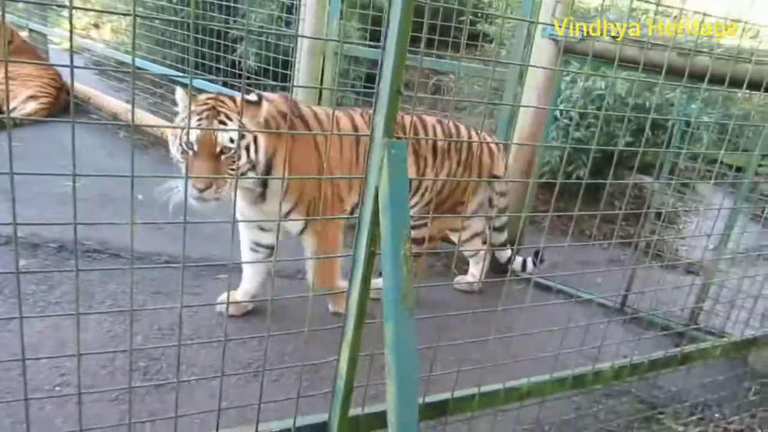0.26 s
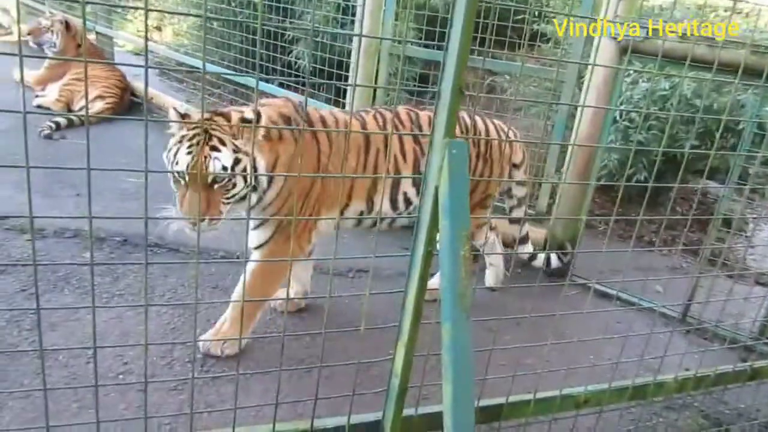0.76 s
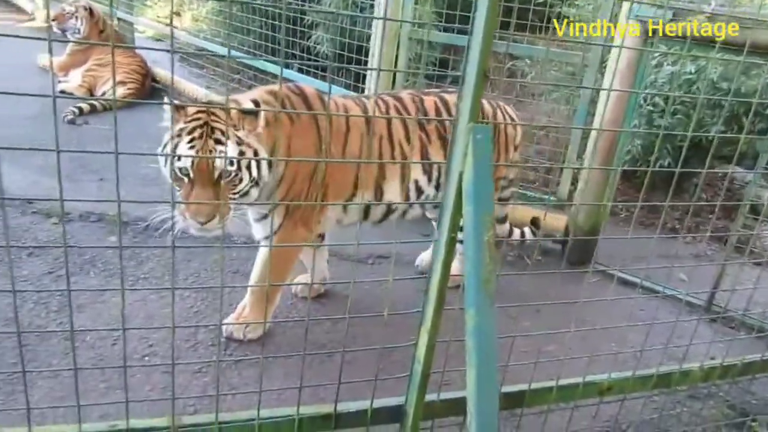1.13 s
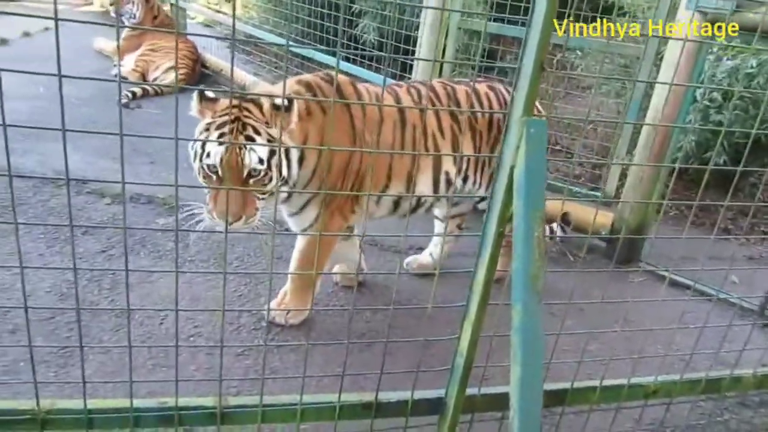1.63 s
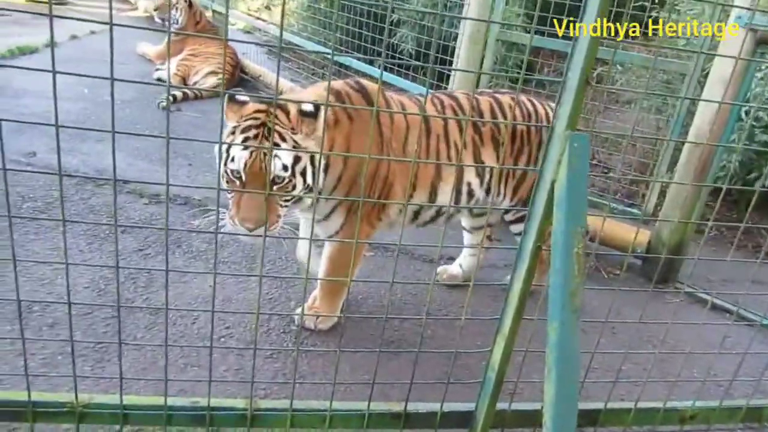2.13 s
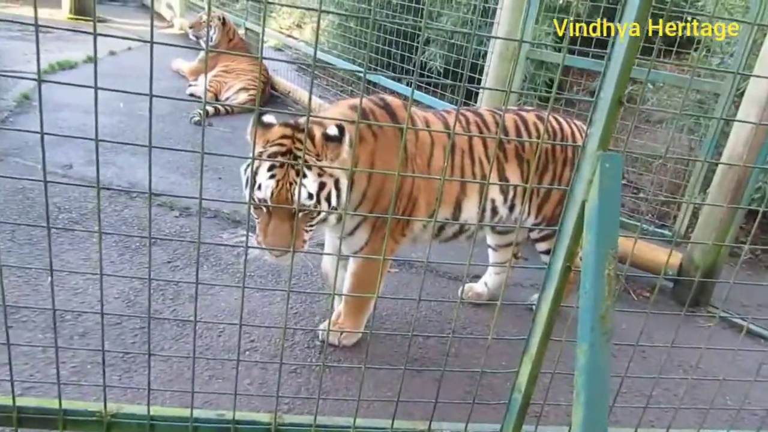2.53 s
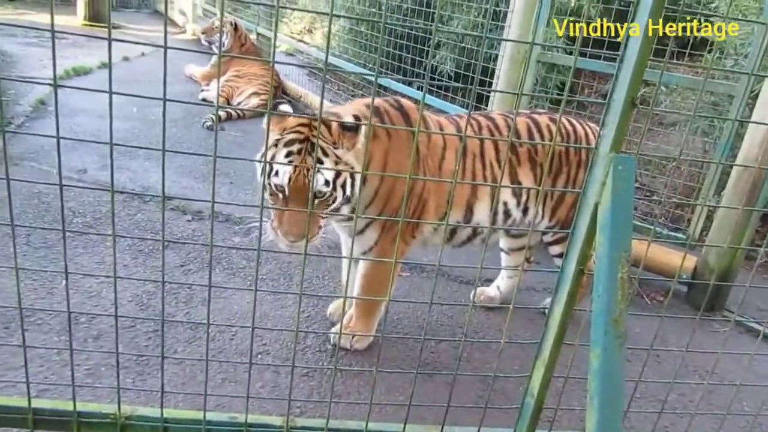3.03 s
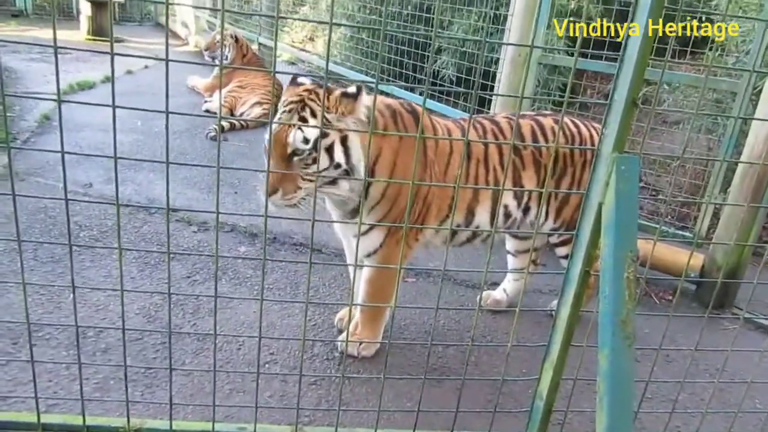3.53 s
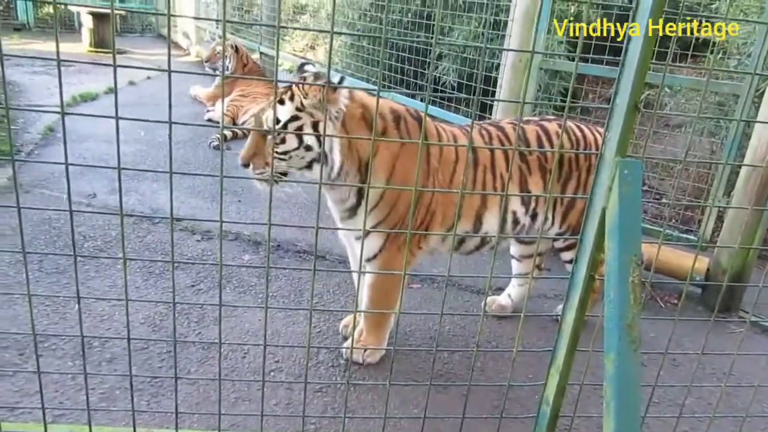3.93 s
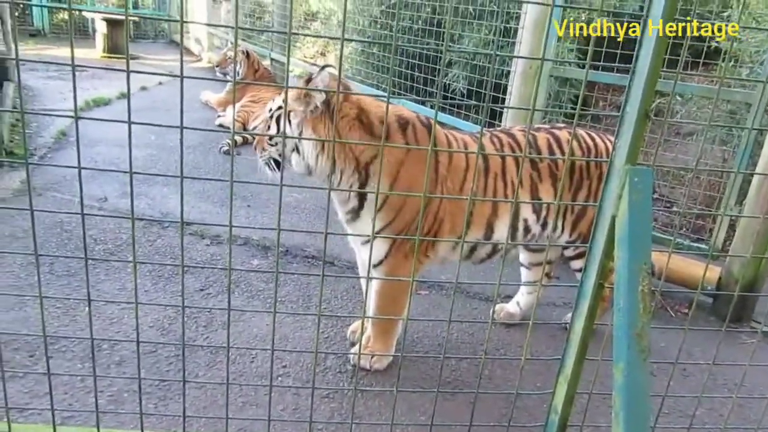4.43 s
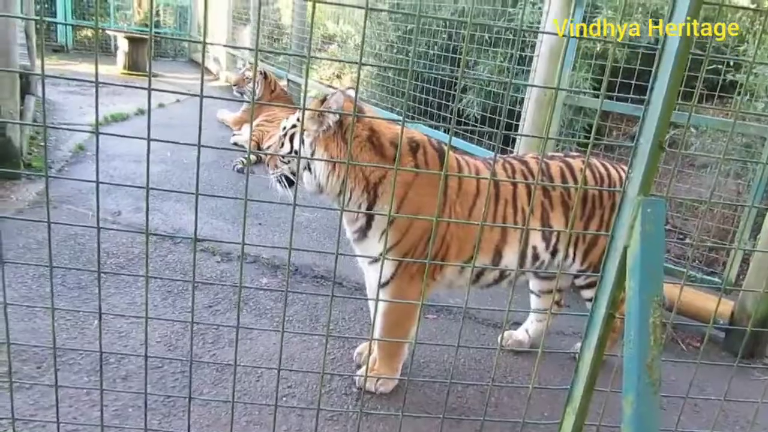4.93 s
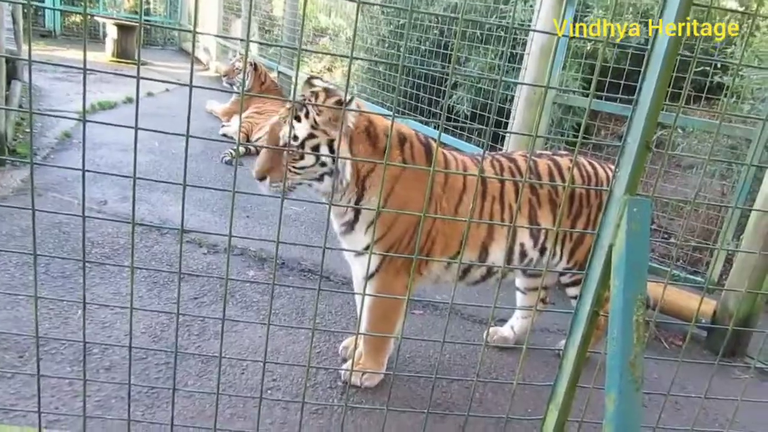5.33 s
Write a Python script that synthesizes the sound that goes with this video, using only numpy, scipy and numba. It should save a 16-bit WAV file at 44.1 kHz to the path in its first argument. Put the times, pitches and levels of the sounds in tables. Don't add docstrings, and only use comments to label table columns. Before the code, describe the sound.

A big cat calls at close range in an outdoor pen, over far traffic rumble and soft hiss. A wavering low chest hum fills the first 0.2 s, and from about 0.12 s a violent short roar bursts through it, loudest near 0.2 s, swinging between hoarse tone and rough, breathy chaos, overdriving the microphone, and falling away by 0.75 s. A tiny lip smack comes at 0.78 s. From 0.82 s a deep growl flaps about forty times a second with irregular harder slaps, strong around 1.0 and 1.5 s; the jaw opens and it brightens, catches briefly, then thins into rattling puffs ending near 2.37 s. The airy background dims until 3.6 s. Faint high bird whistles come at 2.2-2.6 s, lower ones at 4.1-4.8 s. Soft wind thuds bump from 2.95 s, strongest at 4.7 and 5.4 s. Tiny wire ticks fall at 3.77 and 4.78 s.

```python
import sys
import numpy as np
from scipy import signal
from scipy.fft import rfft, irfft, next_fast_len
from scipy.io import wavfile
from scipy.ndimage import uniform_filter1d, map_coordinates
from numba import njit

SR = 44100
rng = np.random.default_rng(int(sys.argv[2]) if len(sys.argv) > 2 else 0)


def ratio(d):
    e = np.asarray(d, float) / 20
    return 10 ** e


def digitize_waveform(pressure):
    field = np.atleast_2d(pressure).T
    bounded = np.clip(field, -1, 1)
    quanta = np.round(bounded * 32767).astype(np.int16)
    wavfile.write(sys.argv[1], SR, quanta)


N = 246078

# frequency in Hz, density in dB per Hz.
RUMBLE_SPECTRUM = [(12, -38), (20, -8.5), (54, -2.5), (140, -3), (162, -4.5), (193, -6.5), (285, -10.5),
                   (353, -26), (400, -13), (520, -34.5), (880, -120)]
# frequency in Hz, density in dB per Hz.
HISS_SPECTRUM = [(300, -3.5), (500, -3), (890, 1.5), (1300, -4), (1900, -7.5), (2600, -15.5), (4000, -24.5),
                 (6000, -26.5), (9000, -30), (12000, -36.5), (15000, -42)]
# frequency in Hz, density in dB per Hz.
PEN_SPECTRUM = [(40, -36), (300, 8.5), (800, 2.5), (1600, -2.5), (2500, -10), (5000, -15.5), (8500, -13.5),
                (8700, -39.5)]
# time in seconds, pitch in Hz, level in dB.
PRELUDE = [(0.0, 159.3, -20), (0.032, 170.7, -28), (0.138, 143.7, -18.5), (0.178, 172, -14.5),
           (0.2, 176, -31.5)]
# time in seconds, pitch in Hz, effort in dB, chaos 0-1, breath in dB.
ROAR = [
    (.118, 330, -20, 1.02, -23.5),
    (.165, 491.1, -4.5, 1.05, -16),
    (.2, 427.1, 12.5, 0.45, -17),
    (.28, 375.6, -4, 0.91, -12),
    (.44, 266.1, 1.5, 0.26, -22.5),
    (.52, 327.5, -3.5, 0.51, -10.5),
    (.64, 284.2, -8, 0.57, -22),
    (.73, 260.7, -18, 0.8, -34.5),
    (.77, 259.3, -52, 0.54, -56),
]
# centre in Hz, width in Hz, level in dB.
ROAR_THROAT = [(258.6, 66, 2), (429, 153, -5)]
# centre in Hz, width in Hz, level in dB.
ROAR_MOUTH = [(680, 75, 0), (960, 110, -4), (1280, 220, -6)]
# centre in Hz, width in Hz, level in dB.
ROAR_RASP = [(1710, 110, 21.5), (2220, 2200, 6.5), (3450, 510, -29.5), (4240, 3000, 4)]
# time in seconds, dip in dB.
CATCHES = [
    (.566, 9.5),
    (.628, 6.5),
    (1.377, 19),
    (1.533, 14),
]
# time in seconds, chest pitch in Hz, effort in dB, jaw opening 0-1.
GROWL = [
    (.82, 178, -26.5, 0.13),
    (.9, 174.8, -18, 0),
    (1.0, 161.2, -21.5, 0.25),
    (1.07, 169.4, -15.5, 0.49),
    (1.19, 143.6, -19, 0.45),
    (1.29, 135.3, -17.5, 0.99),
    (1.48, 143.6, -17, 0.86),
    (1.8, 112.9, -26, 0.6),
    (2.365, 113.3, -40, 0.56),
]
# time in seconds, peak in dB.
SLAPS = [(0.839, -19), (0.864, -11), (0.897, -11.5), (0.918, -9.5), (0.946, -9), (1.022, -0.5),
         (1.059, -18), (1.13, -6.5), (1.2, -6.5), (1.236, -14.5), (1.279, -21.5), (1.32, -9.5),
         (1.388, -16.5), (1.442, -10), (1.517, 0.5), (1.551, -13.5), (1.599, -9), (1.659, -8),
         (1.71, -12.5), (1.734, -6), (1.81, -10.5), (1.886, -18), (1.95, -13), (1.979, -16), (2.033, -13.5),
         (2.09, -17.5), (2.198, -11.5), (2.27, -12), (2.324, -16), (2.351, -15)]
# centre in Hz, width in Hz, level in dB.
OPEN_RASP = [(1597, 81, 13.5), (2104, 110, 7.5), (2520, 210, 8.5), (2950, 260, 6), (3300, 314, 7.5),
             (4140, 180, -3)]
# centre in Hz, width in Hz, level in dB.
NARROW_RASP = [(1685, 23, 17.5), (2150, 260, 9.5), (2420, 180, 6), (3290, 44, 16), (4130, 280, 4)]
# frequency in Hz, T60 in seconds.
YARD_T60 = [(150, 0.44), (1000, 0.082), (5000, 0.14)]
# start in seconds, length in seconds, first pitch in Hz, last pitch in Hz, level in dB.
BIRDS = [(2.24, .085, 7100, 6200, -56), (2.425, .07, 7350, 7330, -48), (2.495, .04, 6800, 6100, -53),
         (2.575, .06, 6200, 5000, -54), (4.09, .035, 3850, 3780, -59), (4.135, .04, 4550, 4480, -58),
         (4.2, .06, 3320, 3250, -57), (4.205, .07, 4550, 4500, -59), (4.445, .04, 3820, 3830, -58),
         (4.495, .06, 2820, 2780, -51), (4.58, .04, 3830, 3820, -59), (4.74, .035, 3800, 3800, -60)]
# start in seconds, peak in dB, frequency in Hz.
THUDS = [
    (2.95, -29, 68),
    (4.018, -29.5, 78),
    (4.44, -33, 50),
    (4.708, -25, 57),
    (5.21, -31.5, 68),
    (5.39, -22.5, 40.4),
]
# start in seconds, peak in dB, ring in Hz, crack share 0-1.
TICKS = [
    (3.769, -37, 6800, .25),
    (4.7816, -37, 12000, 1),
]
# time in seconds, offset in full scale.
OFFSET = [(0, -.027), (.7, -.024), (1.1, -.02), (2, -.019), (2.6, -.016), (3.6, 0)]

# dB at effort -19 dB and shut jaw, dB per dB of effort, dB gained by the open jaw.
CHEST_DB, THROAT_DB, MOUTH_DB = (-23, 1.34, 0.092), (-21.5, 1.02, -3.5), (-28, 0.33, 3.33)
RASP_DB, HUM_DB = (-58, 0.35, 30.4), (-21.5, 0.72, -1.6)
MIDDLE_DB, HIGH_DB = (-12.5, 0.45, 17.5), (-3, 0.1, -3.5)
# Hz with shut jaw, Hz gained by the open jaw, drift in Hz per second.
THROAT_HZ, LOW_HZ, MIDDLE_HZ, HIGH_HZ = (427, -53, -39), (697, 178, 8.4), (1008, 80, 25), (1376, 80, -130)


def unit(x):
    return x / np.sqrt(np.mean(x ** 2) + 1e-20)


def along(points, hz):
    f, v = np.transpose(points)
    return np.interp(np.log(hz + 1), np.log(f + 1), v)


def curves(rows):
    s, *cols = np.transpose(rows)
    return np.array([np.interp(np.arange(N) / SR, s, c) for c in cols])


def wobble(rate_hz):
    knots = rng.standard_normal(int(N * rate_hz / SR) + 4)
    return map_coordinates(knots, [np.arange(N) * rate_hz / SR])


def filtered(x, response):
    m = next_fast_len(N + SR // 2)
    return irfft(rfft(x, m) * response(np.fft.rfftfreq(m, 1 / SR)), m)[..., :N]


def modes(x, table):
    def response(f):
        total = 0
        for k, (centre, width, db) in enumerate(table):
            band = 1j * f * width
            total = total + (-1) ** k * ratio(db) * band / (centre * centre - f * f + band)
        return total
    return unit(filtered(x, response))


@njit
def resonate(x, turn, radius):
    y = np.zeros(len(x))
    for i in range(2, len(x)):
        y[i] = x[i] - x[i - 2] + 2 * radius * np.cos(turn[i]) * y[i - 1] - radius * radius * y[i - 2]
    return y


def cavity(x, hz, width_hz, skirt_hz):
    for w in (width_hz, skirt_hz):
        x = resonate(x, 2 * np.pi * hz / SR, np.exp(-np.pi * w / SR))
    return unit(x)


def rush(spectrum, patchy_db):
    z = signal.stft(rng.standard_normal(N + 512), nperseg=512)[2]
    field = uniform_filter1d(rng.standard_normal(z.shape), 5, 0)
    field = uniform_filter1d(field, 12, 1)
    noise = signal.istft(z * ratio(patchy_db * unit(field)), nperseg=512)[1][:N]
    return unit(filtered(noise, spectrum))


def law(rule, effort_db, jaw):
    return rule[0] + rule[1] * (effort_db + 19) + rule[2] * jaw


def caught(effort_db):
    width_s = .009
    t = np.arange(N) / SR
    return effort_db - sum(db * np.exp(-((t - s) / width_s) ** 2) for s, db in CATCHES)


def background():
    t = np.arange(N) / SR
    rumble_db = -36.5 + 2.3 * wobble(5.56)
    rumble = ratio(rumble_db) * rush(lambda hz: ratio(along(RUMBLE_SPECTRUM, hz)), patchy_db=1.5)
    hiss_db = -37 + 0.24 * wobble(4)
    hiss = ratio(hiss_db) * rush(lambda hz: ratio(along(HISS_SPECTRUM, hz)) * (hz > 150), patchy_db=.5)
    pen = ratio(-33.5) * rush(lambda hz: ratio(along(PEN_SPECTRUM, hz)), patchy_db=2.1)
    fade = np.interp(t, (2.03, 3.64), [1, 0])
    duck = ratio(-4 * np.exp(-((t - 2.465) / 0.046) ** 2))
    return rumble + hiss + pen * fade * duck


def hum(gate, pitch_hz, waver):
    pitch_hz = pitch_hz * (1 + waver * wobble(39.69))
    smooth = uniform_filter1d(uniform_filter1d(gate, size=450), size=450)
    throb = unit(1 + 9 * smooth) * ratio(1.4 * wobble(13.23))
    return throb * np.sqrt(2) * np.sin(2 * np.pi * np.cumsum(pitch_hz) / SR)


def roar():
    pitch_hz, effort_db, chaos, bark_db = curves(ROAR)
    t = np.arange(N) / SR
    on = (t > ROAR[0][0]) & (t < ROAR[-1][0])
    chaos = np.clip(chaos, 0, 1)
    effort_db = caught(effort_db)
    pitch_hz = pitch_hz * (1 + np.sqrt(chaos) * (.15 * wobble(55) + .07 * wobble(130)))
    phase = 2 * np.pi * np.cumsum(pitch_hz) / SR

    fold_noise = cavity(rng.standard_normal(N), pitch_hz, width_hz=72, skirt_hz=310)
    throat = modes(modes(rng.standard_normal(N), ROAR_THROAT), ROAR_THROAT)
    throat_share = np.interp(t, (0.21, 0.26), [.25, .7])
    wild = unit(fold_noise + throat_share * throat)
    swing = signal.hilbert(np.sqrt(2 - 2 * chaos) * np.sin(phase) + np.sqrt(chaos) * wild)
    voice = np.real(swing + .13 * swing ** 3 / (np.abs(swing) ** 2 + 1e-9))
    voice = voice + 0.14 * np.real(swing ** 2 / (np.abs(swing) + 1e-9))

    spits = rng.standard_normal(N) * ratio(3 * wobble(75))
    bark = ratio(bark_db) * modes(spits, ROAR_MOUTH)
    rasp_db = -32 + 0.77 * (bark_db + 22)
    rasp_onset = np.clip((t - .11) / .07, 0, 1) ** 2
    upper = on * (bark + ratio(rasp_db) * modes(spits, ROAR_RASP) * rasp_onset)
    driven_db = np.maximum(effort_db + 2, 0) - 3.5
    burst = on * ratio(effort_db) * voice + ratio(driven_db) * upper
    return burst, ratio(-7.5) * upper


def smack():
    start_s, level_db, decay_s = .776, -23, .004
    t = np.arange(N) / SR
    envelope = (t > start_s) * np.exp(-np.abs(t - start_s) / decay_s)
    return ratio(level_db) * envelope * modes(rng.standard_normal(N), [(1750, 600, .1)])


def flaps(puff_s, spit_s):
    flap_rate_hz = 41
    hard, peak_db = np.transpose(SLAPS)
    marks = np.r_[.01, hard, hard[-1] + .06]
    counts = np.maximum(1, np.round(np.diff(marks) * flap_rate_hz))
    beats = np.r_[0, np.cumsum(counts)]
    order = np.arange(beats[-1])
    luck = rng.standard_normal((len(order), 3))
    soft = ~np.isin(order, beats[1:])
    times = np.interp(order + 0.094 * luck[:, 0] * soft, beats, marks)

    size_db = np.array([[-4], [-1.5]]) + np.array([[2], [2.5]]) * luck[:, 1:].T
    around_db = uniform_filter1d(peak_db, size=7, mode="nearest")
    size_db[:, ~soft] = 0.53 * (peak_db - around_db)
    train = np.zeros((2, N))
    train[:, np.round(times * SR).astype(int)] = ratio(size_db)
    t = np.arange(SR // 16) / SR
    rise = 1 - np.exp(-t / np.array([[.001], [.004]]))
    shape = rise * np.exp(-t / np.array([[puff_s], [spit_s]]))
    puff, spit = np.abs(signal.fftconvolve(train, shape, axes=1)[:, :N])
    return unit(train[0]), unit(puff), unit(spit)


def growl():
    chest_hz, effort_db, jaw = curves(GROWL)
    t = np.arange(N) / SR
    effort_db = caught(effort_db)
    outside_s = np.maximum(GROWL[0][0] - t, 0) + np.maximum(t - GROWL[-1][0], 0)
    on = ratio(-403 * outside_s)
    before = t < PRELUDE[-1][0]
    first_hz, first_db = curves(PRELUDE)
    chest_hz = np.where(before, first_hz, chest_hz)

    rules = (CHEST_DB, THROAT_DB, MOUTH_DB, RASP_DB, HUM_DB)
    gains = [on * ratio(law(rule, effort_db, jaw)) for rule in rules]
    chest_gain, throat_gain, mouth_gain, rasp_gain, hum_gain = gains
    drift_s = np.clip(t - 1, -1, 2)
    airways = (THROAT_HZ, LOW_HZ, MIDDLE_HZ, HIGH_HZ)
    throat_hz, low_hz, middle_hz, high_hz = (shut + wide * jaw + drift * drift_s for shut, wide, drift in airways)
    middle_db = law(MIDDLE_DB, effort_db, jaw)
    high_db = law(HIGH_DB, effort_db, jaw) + 24 * (t > 2.348)
    narrow = np.interp(t, (1.62, 1.72, 2.0, 2.06), [.03, 1, 1, .1])

    knock, gate, spit_gate = flaps(puff_s=0.009, spit_s=0.0032)
    air = rng.standard_normal((4, N))
    even = unit(np.sqrt(knock))
    deep = (.4 + .15 * gate) * air[0] + even
    puffs = (.35 + gate) * air + .55 * knock
    spit = (.15 + spit_gate) * air[3] + .25 * knock

    chest = cavity(deep, chest_hz, width_hz=70, skirt_hz=190)
    chest = chest + ratio(-8) * cavity(deep, .62 * chest_hz, width_hz=45, skirt_hz=80)
    throat = cavity(puffs[0], throat_hz * (1 + 0.062 * wobble(25.19)), width_hz=51.2, skirt_hz=128)
    throat = throat + ratio(-1.0) * cavity(deep, 0.716 * throat_hz, width_hz=49, skirt_hz=225)
    mouth = cavity(puffs[1], low_hz * (1 + 0.028 * wobble(24.65)), width_hz=63, skirt_hz=240)
    mouth = mouth + ratio(middle_db) * cavity(puffs[2], middle_hz, width_hz=94, skirt_hz=500)
    mouth = mouth + ratio(high_db) * cavity(puffs[3], high_hz, width_hz=90, skirt_hz=900)
    mouth /= np.sqrt(1 + ratio(2 * middle_db) + ratio(2 * high_db))
    rasp = np.sqrt(1 - narrow) * modes(spit, OPEN_RASP)
    rasp = rasp + ratio(1) * np.sqrt(narrow) * modes(spit, NARROW_RASP)

    hum_joins = np.clip((t - 1.04) / 0.02, 0, 1)
    tone = hum(even, chest_hz, waver=np.where(before, .08, 0.11 * jaw ** 2))
    tone = tone * (before * ratio(first_db) + hum_gain * hum_joins)
    body = (chest_gain + before * ratio(first_db - 4)) * chest
    return tone + body + throat_gain * unit(throat) + mouth_gain * mouth + rasp_gain * rasp


def yard(x):
    hz, t, z = signal.stft(rng.standard_normal(SR // 2), SR, nperseg=256)
    decay = ratio(-60 * t / along(YARD_T60, hz)[:, None])
    tail = signal.istft(z * decay, SR, nperseg=256)[1]
    return signal.fftconvolve(np.pad(x, (500, 0)), tail / np.linalg.norm(tail))[:N]


def limited(x, top):
    starts = np.r_[0, np.flatnonzero(np.diff(np.signbit(x))) + 1]
    peaks = np.maximum.reduceat(np.abs(x), starts)
    gain = np.minimum(1, top / (peaks + 1e-9))
    return x * np.repeat(gain, np.diff(np.r_[starts, len(x)]))


def birds():
    out = np.zeros(N + SR)
    for s, length_s, first_hz, last_hz, db in BIRDS:
        u = np.linspace(0, 1, round(length_s * SR))
        trill = ratio(3.8 * np.sin(2 * np.pi * 45 * length_s * u))
        breath = 1.25 + .5 * uniform_filter1d(unit(rng.standard_normal(len(u))) * 8, size=64)
        cycles = length_s * (first_hz * u + (last_hz - first_hz) * u * u / 2)
        note = trill * breath * np.sin(np.pi * u) ** .5 * np.sin(2 * np.pi * cycles)
        out[round(s * SR):][:len(u)] += ratio(db) * note
    return out[:N]


def thuds():
    out = np.zeros(N + SR)
    t = np.arange(SR // 8) / SR
    for s, db, hz in THUDS:
        envelope = np.exp(1 - t / 0.013) * t / 0.016
        out[round(s * SR):][:len(t)] += ratio(db) * np.sin(2 * np.pi * hz * t) * envelope
    return out[:N]


def ticks():
    out = np.zeros(N + SR)
    t = np.arange(SR // 8) / SR
    for s, db, hz, crack in TICKS:
        snap = crack * rng.standard_normal(len(t)) + (1 - crack) * np.sin(2 * np.pi * hz * t)
        out[round(s * SR):][:len(t)] += ratio(db - 60 * t / .003) * snap
    return out[:N]


def scene():
    burst, breath = roar()
    burst = limited(burst + ratio(-18) * yard(burst), top=0.94)
    burst = filtered(burst, lambda hz: 1 / (1 + (150 / (hz + 1)) ** 6))
    rumble = growl()
    cat = 1.09 * burst + breath + smack() + rumble + ratio(-10.5) * yard(rumble)
    cat = limited(cat, top=0.83)
    microphone_top_hz = 8620

    def microphone(hz):
        treble = (hz < microphone_top_hz) / np.sqrt(1 + (hz / 5000) ** 4)
        return treble / (1 + (48 / (hz + 1)) ** 4)

    cat = filtered(cat, microphone)
    return (cat + background() + birds() + thuds() + ticks())[None]


def band_limit(x):
    return signal.sosfilt(signal.butter(12, 15610, fs=SR, output="sos"), x)


def record(dry):
    top_hz = 15030
    mix = filtered(dry, lambda hz: hz < top_hz) + curves(OFFSET)
    return band_limit(mix)


dry = scene()
out = record(dry)
digitize_waveform(out)
```